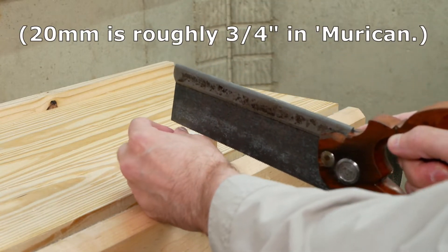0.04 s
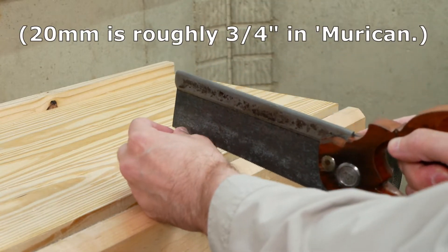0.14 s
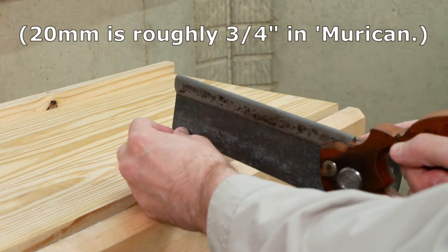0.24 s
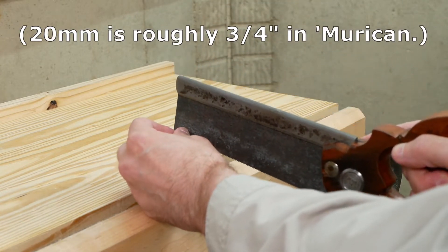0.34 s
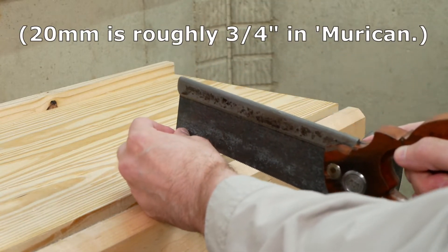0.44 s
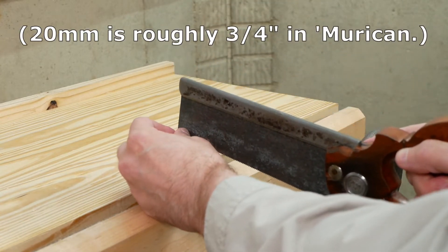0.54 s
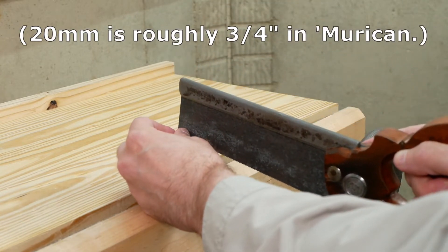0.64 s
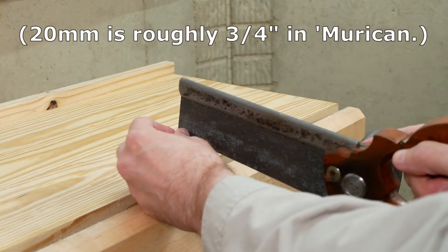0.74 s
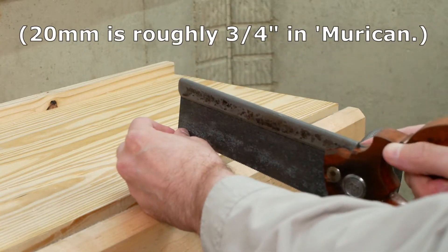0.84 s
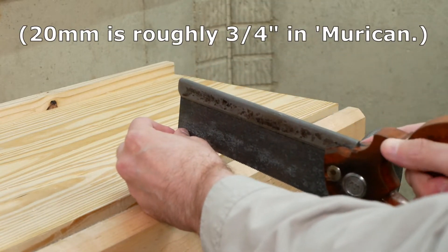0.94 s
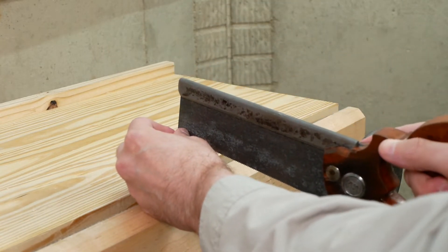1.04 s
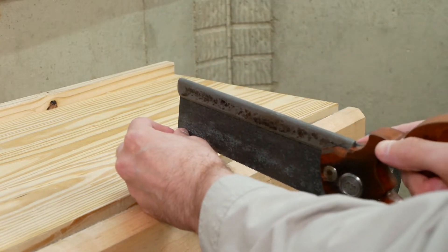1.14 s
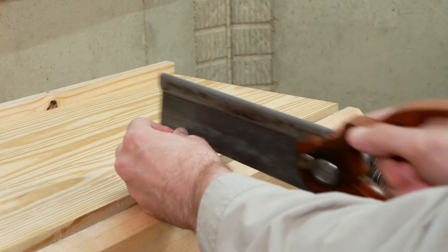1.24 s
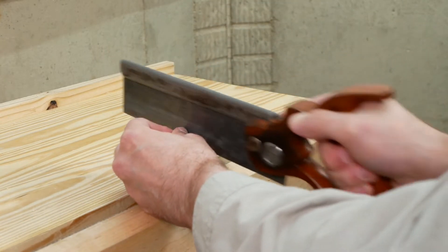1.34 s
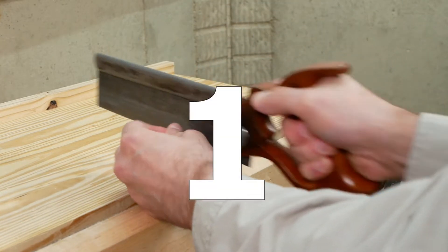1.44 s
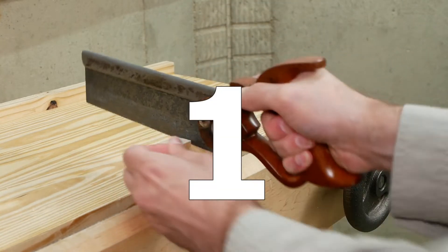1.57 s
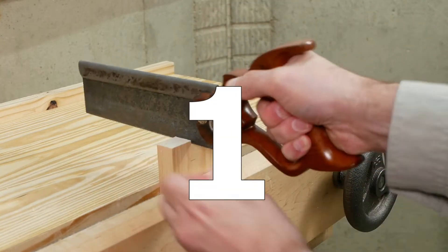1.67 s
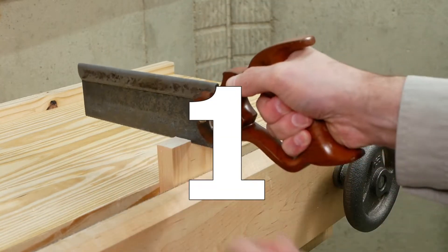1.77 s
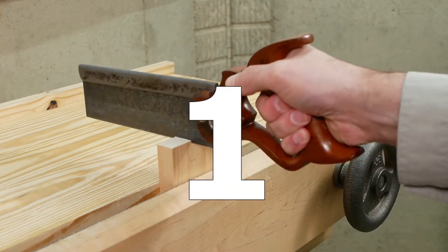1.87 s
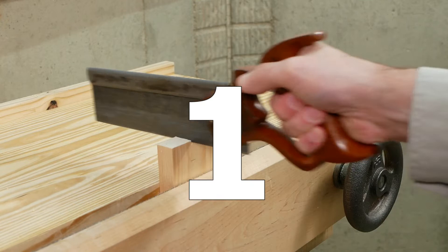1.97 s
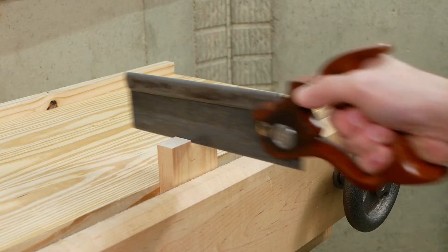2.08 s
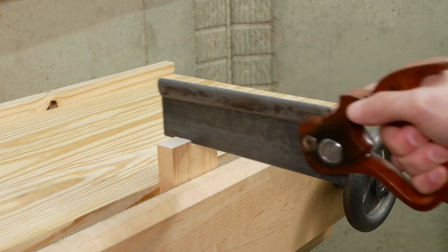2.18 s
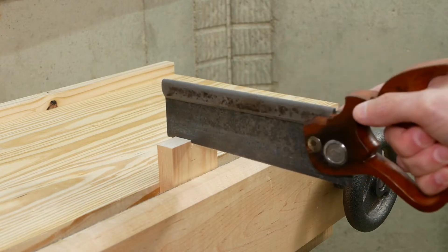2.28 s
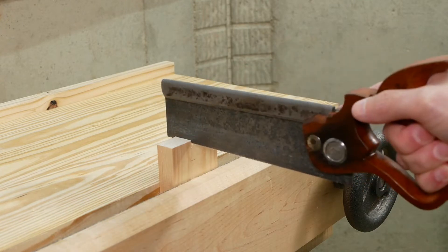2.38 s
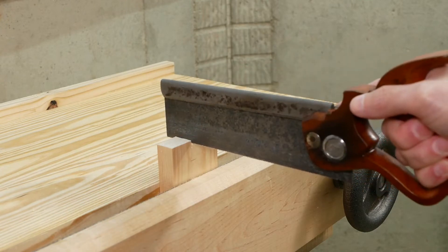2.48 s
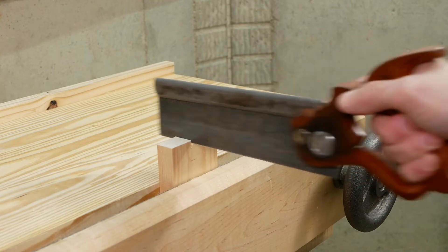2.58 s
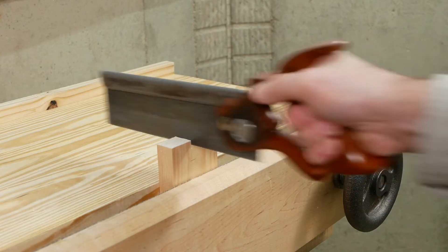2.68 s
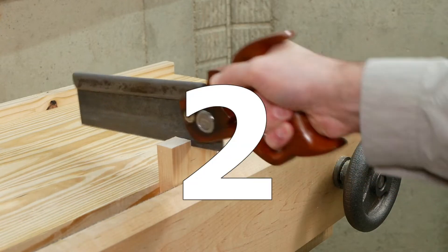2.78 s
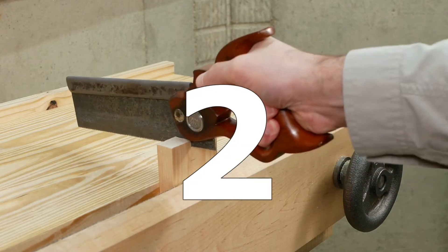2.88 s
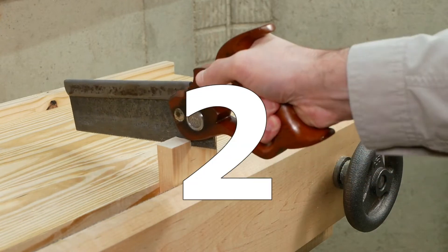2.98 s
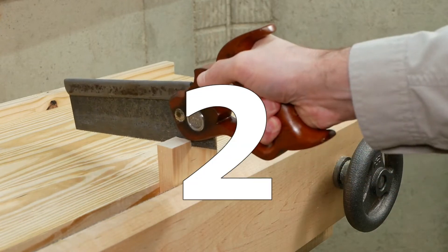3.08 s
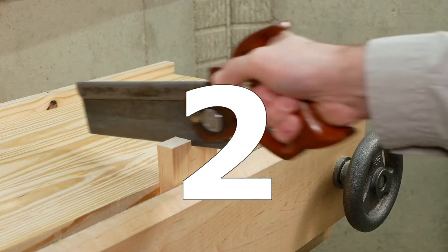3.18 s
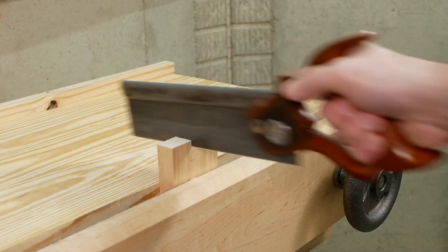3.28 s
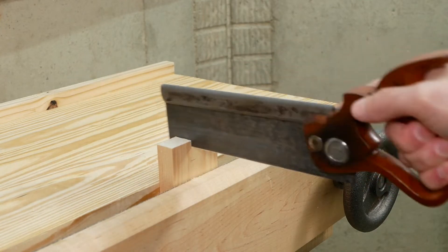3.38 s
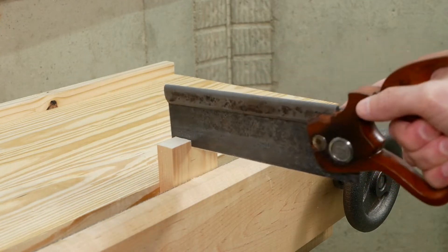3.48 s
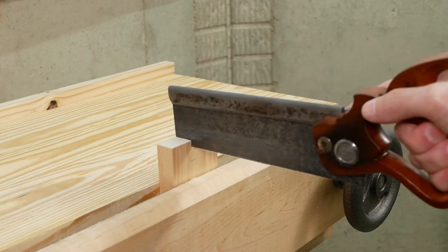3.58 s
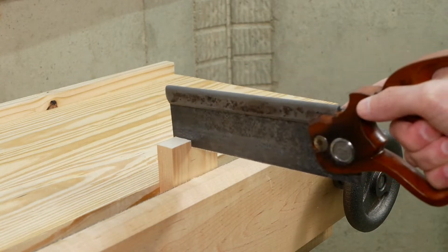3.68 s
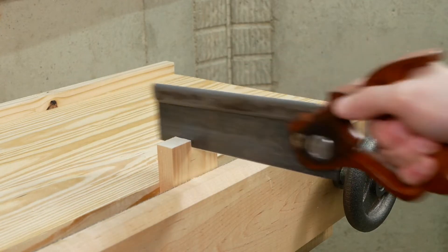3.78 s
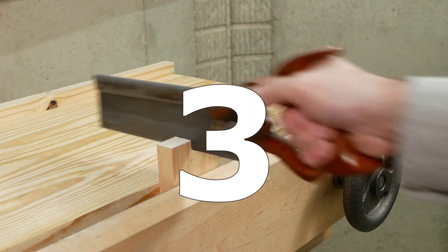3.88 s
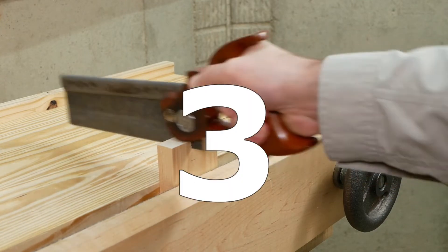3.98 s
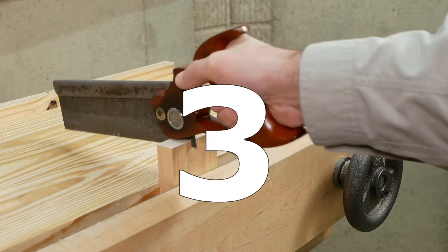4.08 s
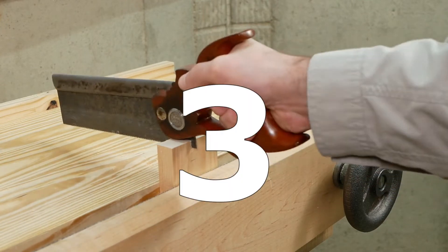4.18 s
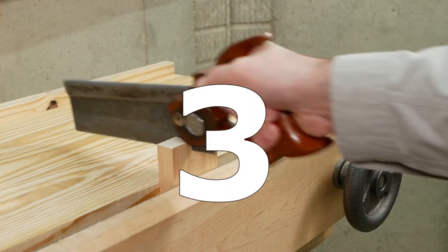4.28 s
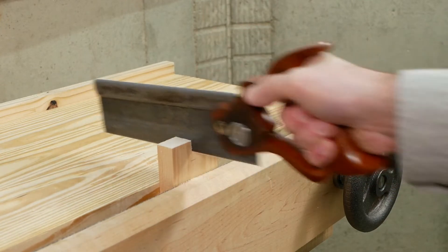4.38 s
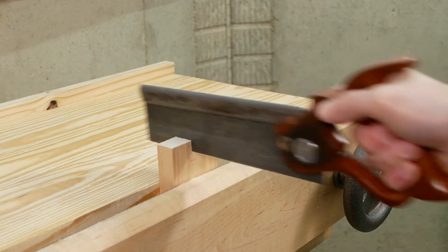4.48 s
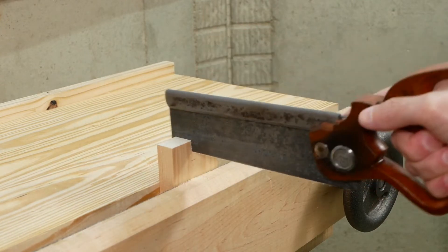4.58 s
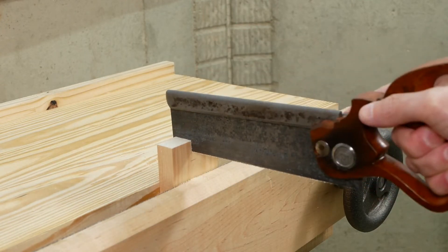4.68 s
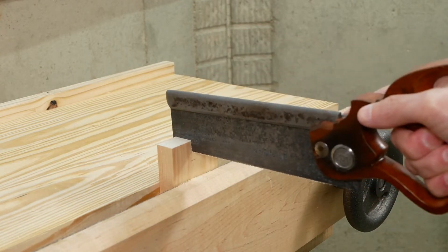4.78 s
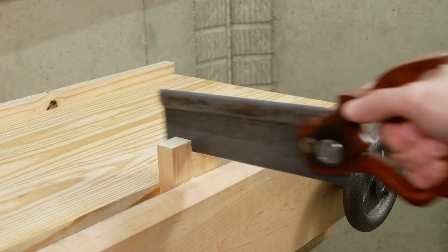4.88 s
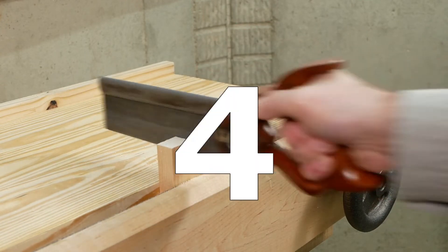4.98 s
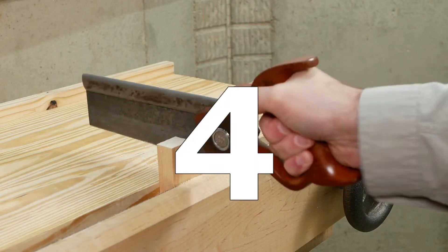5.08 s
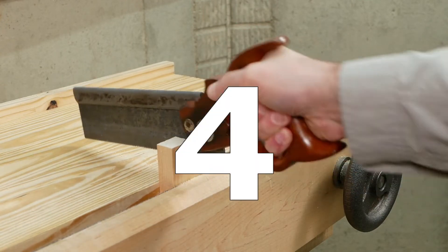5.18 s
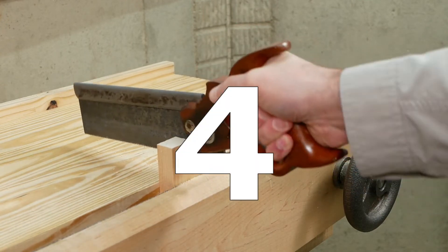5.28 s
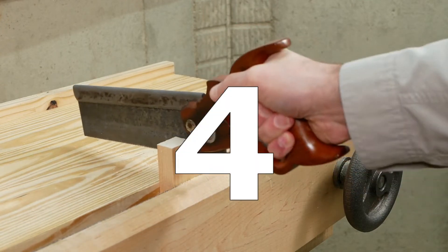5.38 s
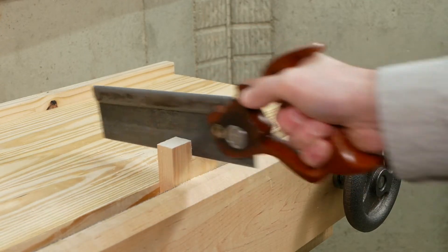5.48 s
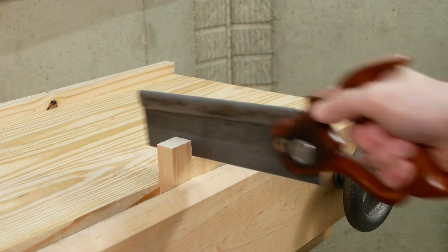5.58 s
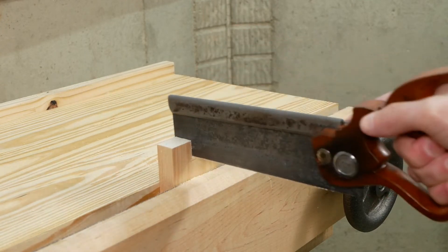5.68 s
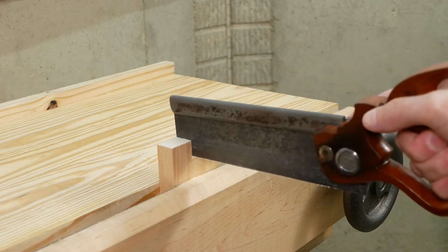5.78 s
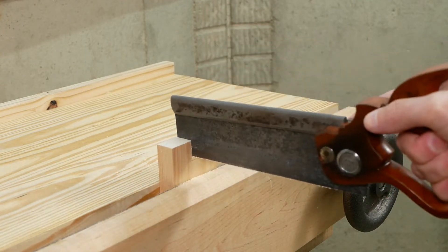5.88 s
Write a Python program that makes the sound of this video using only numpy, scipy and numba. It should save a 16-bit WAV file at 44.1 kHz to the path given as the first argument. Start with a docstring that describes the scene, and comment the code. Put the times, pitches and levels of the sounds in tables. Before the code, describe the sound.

Four push and four pull strokes of a hand saw rasp and buzz through clamped wood, following a second of near silence.

```python
"""Wooden groans, steely rasps and hiss: a backsaw, set on a small block in a wooden vise, cuts four pushes and
four pulls. Before the cut it rubs, ticks, pings and slides faintly into place. Teeth knock at stepped rates and
boom in bench and block where a rate meets a mode; torn fibres rattle the steel plate and hiss.
One microphone hears the saw well above the workshop's short reflections, over quiet air."""
import sys
import numpy as np
from scipy import signal
from scipy.fft import rfft, irfft, next_fast_len
from scipy.io import wavfile
from scipy.ndimage import uniform_filter1d
from numba import njit

SR = 44100
rng = np.random.default_rng(int(sys.argv[2]) if len(sys.argv) > 2 else 0)


def inscribe(sig):
    """Save sig as 16-bit PCM at rate SR to the path in sys.argv[1].

    A 1-D sig is mono; a 2-D sig holds one channel per row.
    Samples are clipped to [-1, 1] before scaling.
    """
    pcm = np.round(np.clip(np.atleast_2d(sig).T, -1, 1) * 32767)
    wavfile.write(sys.argv[1], SR, pcm.astype(np.int16))


N = 261537
STEP = 32   # samples between updates of slow controls

# Tables of modes share these columns; drives are relative:
# (frequency [Hz], width [Hz], push drive [dB], pull drive [dB], change while the cut is shallow [dB])
# modes of the bench
BENCH_MODES = [(60, 38, -24.5, -27, 2.5), (84, 4.7, -19.5, -18, 9), (123, 7.8, -4, -23.5, 2),
               (142.5, 14, -7.5, -3, -3.5), (160.4, 20.3, -9, -2.5, -6)]
# modes of block and vise, same columns
BLOCK_MODES = [(235.1, 20, -4, -5, 3.5), (324.7, 24.2, -3.5, -0.5, 3.5), (397.4, 101, -7.5, -10, 0.5),
               (483, 30.9, 1.5, 3, -4), (507.3, 35.8, -4.5, -6, 2), (752, 250, -32, -18, 11.5)]
# modes of saw plate and block surface, same columns
PLATE_MODES = [(824.5, 39, 0.5, -7, 1), (988.7, 42, 1.5, 6.5, 2.5), (1077, 23.5, 5, -6.5, -9),
               (1169, 32.5, 2, -6, -2), (1221, 45, -5.5, -7.5, 9), (1405, 235, -4.5, -7, 4),
               (1467, 91, -6, -2.5, 7.5), (1576, 150, -8.5, -10.5, 3.5), (1930, 76, -8, -11, 1.5),
               (2162, 86, -2.5, -5, 2.5), (2298, 38, 0.5, -1.5, -5.5), (2381, 51, -3, -7, 3),
               (2650, 110, -4, -12, -2.5), (2855, 39, -2, -17.5, -1), (3050, 160, -16, -27, 6),
               (3640, 172, -13, -22.5, 4)]
# high rings of the plate, same columns
PLATE_RINGS = [(4270, 63, 1.5, -8, -3), (5080, 77, 6.5, 6.5, -10), (5366, 90, 1.5, 2, -16),
               (5559.4, 150, 13, -9, -32), (5220, 650, -7, -21, -6)]
# highest rings, driven by the dust, same columns
TOP_RINGS = [(6560, 630, -7, -12, 2.5), (8150, 530, -9, -7, -2.5), (10340, 330, -6, -9, -1.5),
             (11400, 400, -12.5, -18, -1), (14560, 1600, -7.5, -8, -2)]

# colour of the fibre hiss: (frequency [Hz], relative density [dB])
HISS_COLOUR = [(2180, -1), (3700, -7.5), (4740, -6), (5540, -8.5), (6300, -22), (8190, -50), (13900, -120)]
# colour of the fine dust hiss: (frequency [Hz], relative density [dB])
DUST_COLOUR = [(3530, -8), (6000, -3), (7020, -4.5), (7950, 1.5), (9080, -1), (10300, 1.5), (12600, -8),
               (14200, -11), (15100, -6), (15750, -4)]

# effort of the cut, short curves one after another:
# (time [s], rasp of the plate [dB], groan of the block [dB], hiss of the dust [dB])
EFFORT = [
    [(1.23, -59, -64, -64), (1.262, -35.5, -35, -39.5), (1.372, -28, -22, -37.5), (1.404, -32, -27, -41),
     (1.542, -32, -20.5, -42), (1.574, -49, -28.5, -54), (1.626, -61.5, -55, -57.5),
     (1.752, -67.5, -64, -59), (1.84, -70, -67, -58.5), (1.92, -65, -68, -61), (1.982, -66, -67, -67),
     (2.0, -50, -60, -61)],
    [(2.0, -49, -47, -61), (2.016, -42, -43.5, -55), (2.052, -38, -29, -51.5), (2.14, -33.5, -27.5, -47.5),
     (2.222, -40.5, -26, -54), (2.32, -63, -58, -76), (2.43, -77.5, -77, -73), (2.588, -66, -63, -74),
     (2.594, -51.5, -46, -56), (2.625, -54.5, -44.5, -67)],
    [(2.625, -52, -55, -51.5), (2.637, -35, -29, -45), (2.661, -34.5, -25.5, -41), (2.679, -23, -37, -41.5),
     (2.697, -28, -20, -38.5), (2.745, -26.5, -18, -37), (2.869, -40, -26.5, -49),
     (2.973, -61, -54.5, -72.5), (3.137, -95, -71, -74.5), (3.168, -63, -65, -86)],
    [(3.168, -56, -67, -68), (3.196, -46.5, -45.5, -55.5), (3.242, -35, -32, -53), (3.352, -32.5, -22, -46),
     (3.388, -32.5, -39.5, -50.5), (3.414, -36, -24.5, -54.5), (3.526, -67, -61, -77.5),
     (3.568, -53, -49, -60.5), (3.664, -79, -63, -88), (3.685, -75, -66, -86)],
    [(3.685, -61, -65, -81), (3.715, -50.5, -42.5, -52.5), (3.783, -77.5, -75.5, -87),
     (3.8, -60.5, -55, -68)],
    [(3.8, -54, -70, -71), (3.808, -38.5, -30.5, -46), (3.832, -26.5, -26.5, -39.5),
     (3.966, -24.5, -29.5, -37.5), (3.978, -25.5, -16, -40), (4.016, -34.5, -22, -43),
     (4.114, -55.5, -62, -66), (4.228, -78, -68, -89), (4.25, -76.5, -68, -91)],
    [(4.25, -60, -65, -77), (4.266, -53.5, -59, -58.5), (4.392, -35, -28.5, -51),
     (4.524, -33.5, -32.5, -47.5), (4.62, -43.5, -33.5, -55.5), (4.77, -80.5, -83, -92),
     (4.836, -106, -86, -94), (4.88, -54, -54.5, -76), (4.918, -58, -59, -74)],
    [(4.918, -46.5, -55.5, -57), (4.95, -27, -23, -42.5), (5.014, -23.5, -30.5, -37),
     (5.062, -26.5, -23, -40), (5.164, -55.5, -46.5, -65), (5.18, -53, -48, -68)],
    [(5.18, -56, -44, -57), (5.19, -40, -37.5, -49.5), (5.226, -37.5, -36.5, -51), (5.248, -49, -41.5, -63),
     (5.344, -72, -75, -75), (5.438, -80, -70, -78)],
    [(5.438, -60, -56, -71), (5.466, -44.5, -52, -59), (5.58, -29, -19.5, -53), (5.642, -33, -32.5, -49.5),
     (5.698, -37, -30, -56), (5.704, -33, -28, -54), (5.804, -62.5, -57.5, -74.5), (5.93, -69.5, -73, -83)],
]
# each stroke, push and pull in turn: (start time [s], fibre hiss against dust hiss [dB])
STROKES = [(1.232, -20), (1.998, 1.5), (2.59, 2), (3.168, 2.5), (3.685, 1.5), (4.25, 2.5), (4.87, 4),
           (5.438, 1.5)]
TURN_EARLY_S, TURN_S = .05, .05   # the saw turns round just before a stroke
SECOND_STROKE_DEPTH, DEPTH_PER_STROKE = .6, .13   # the first push opens the cut, then it deepens to 1

# the teeth chatter at a ring of bench or block, then slip to another: (start time [s], mean rate [teeth/s])
CHATTER = [(0, 220), (1.28, 335), (1.41, 218), (1.49, 121), (1.54, 241), (1.61, 136), (1.99, 238),
           (2.03, 349), (2.1, 472), (2.17, 335), (2.215, 483), (2.259, 330), (2.32, 148), (2.63, 370),
           (2.68, 482), (2.76, 272), (2.775, 110), (2.83, 237), (2.92, 117), (3.19, 343), (3.325, 475),
           (3.395, 376), (3.435, 158), (3.52, 330), (3.78, 241), (3.82, 330), (3.9, 514), (3.995, 298),
           (4.015, 263), (4.039, 121), (4.3, 230), (4.38, 343), (4.475, 406), (4.535, 340), (4.62, 237),
           (4.68, 160), (4.93, 346), (4.97, 537), (5.07, 234), (5.12, 141), (5.44, 236), (5.51, 339),
           (5.635, 447), (5.68, 357), (5.76, 134)]
SLIP_S = .025
# brief jolts in the loudness of rasp and dust hiss:
# (time [s], change just before [dB], change just after [dB])
JOLTS = [(1.502, -9, 4.5), (2.855, -1, 7), (2.89, -11, 4.5), (3.41, 2, 1.5), (3.83, -3, -5),
         (4.501, 1, 1.5), (5.104, -1.5, -3), (5.665, 2.5, 3.5)]
JOLT_BEFORE_S, JOLT_AFTER_S = .012, 0.019   # decay times away from the jolt

# the saw rubs the block while it is set in place: (time [s], block [dB], plate [dB], hiss [dB])
RUBS = [(0.001, -56, -58, -54.5), (0.018, -62, -77, -57.5), (0.088, -65, -75, -70), (0.15, -67, -77.5, -74),
        (0.256, -52.5, -72, -77), (0.29, -63, -81, -62), (0.455, -65.5, -71, -86), (0.495, -60, -71, -84),
        (0.534, -65, -72, -83), (0.565, -66, -74, -88), (0.6, -68, -75, -88), (0.65, -67, -89, -88),
        (0.828, -70.5, -87, -63), (1.15, -75, -80, -68), (1.2, -71, -75, -66)]
RUB_RISE_DB_PER_S, RUB_FALL_DB_PER_S, RUB_HISS_FALL_DB_PER_S = 1497, 303, 501
BRUSH_DB, BRUSH_DARKER_DB = -54, 9   # below this level the first light contact rustles darker

# the saw binds and the bench booms: (time [s], peak level [dB])
BOOMS = [(1.515, -21), (1.617, -34), (2.048, -39.5), (2.21, -29), (2.775, -22), (2.81, -22), (2.862, -22),
         (3.302, -37), (3.414, -37.5), (3.831, -36.5), (4.023, -25.5), (4.355, -42.5), (5.05, -33),
         (5.23, -31.5), (5.497, -39), (5.581, -35)]
BOOM_RISE_DB_PER_S, BOOM_FALL_DB_PER_S = 448, 329.5
FULL_GROAN_DB, BENCH_DB = -26.5, -47   # bench level when the block is at full groan
BENCH_FOLLOWS = 0.56   # share of the block's swing in dB

# a tooth or the plate touches the wood:
# (time [s], relative strength [dB], colour [Hz], drive of the plate against the click [dB])
TICKS = [(.004, -51, 3530, 12), (0.022, -49.5, 1470, 12.5), (0.829, -44.5, 4370, 13),
         (1.691, -39, 2500, -9), (2.595, -36, 2527, 12.5), (3.091, -45, 3000, 9), (3.69, -49, 2611, 13),
         (3.709, -37.5, 2200, 20), (3.832, -31.5, 1200, 30), (3.125, -49, 999, -6), (4.119, -36, 7974, -2),
         (.257, -60, 2150, 16), (.287, -53, 7700, 0), (0.524, -58, 2300, 4), (.87, -58, 1950, -5),
         (1.92, -50, 4000, 0), (.65, -58, 2190, 8), (4.88, -49.5, 2200, 21), (4.89, -48, 2491, -1),
         (5.397, -34.5, 1614, -14)]
# hands and saw bump block and vise: (time [s], relative strength [dB])
BUMPS = [(0.017, -39.5), (0.086, -45), (0.252, -69), (0.529, -54), (0.828, -53.5), (2.636, -15.5),
         (3.974, -22), (4.945, -32)]
# the free plate is flicked before it is in the cut: (time [s], relative strength [dB])
FLICKS = [(.003, -1)]
# tones of the flicked plate: (frequency [Hz], width [Hz], push drive [dB], pull drive [dB])
PING_TONES = [(3079, 9.8, -3, 2), (4280, 30, -7, -8), (4540, 40, -7, -8), (5100, 15, -10, -16),
              (5771, 15, -11, -14)]
# the plate sings faintly as it slides into place: (time [s], level [dB])
SLIDE = [(0.0, -67), (0.254, -72.5), (0.338, -79), (0.524, -73.5), (0.67, -99)]
# tones of the sliding plate: (frequency [Hz], width [Hz], push drive [dB], pull drive [dB])
SLIDE_TONES = [(830, 26, -8.5, 0), (980, 30, -7, 0), (6700, 400, -21.5, -14)]

SHOP_T60_S, SHOP_DB = 0.22, -12.5   # decay time, and level of the reflections' response against direct sound
# colour of the quiet workshop air: (frequency [Hz], relative density [dB])
AIR_COLOUR = [(15, -26.5), (25, 12.5), (70, 3.5), (156, -3), (652, -16), (1000, -15), (1310, -16),
              (1590, -18), (8680, -21), (15700, -25.5)]
AIR_DB = -67.5   # before the microphone's limits
CUTOFF_HZ = 15700   # top of the microphone's range


def saw(pull, depth):
    """Teeth drive bench and block; torn fibres drive the plate and the hiss."""
    teeth_per_s = held(*np.transpose(CHATTER), SLIP_S)
    bench_db, block_db, plate_db, hiss_db, dust_db = levels()
    darker_db = BRUSH_DARKER_DB * ((BRUSH_DB - dust_db) / 6).clip(0, 1) * (depth == 0)
    hiss_db, dust_db = hiss_db + darker_db, dust_db - darker_db

    phase, bites = teeth(teeth_per_s, wobble=.045, uneven_db=5.5)
    load = ((block_db + 62.5) / 25).clip(0, 1)   # teeth bite only under load
    bites = (bites - np.mean(bites)) * load
    clumps = amp(1.1 * filled(wander(43)))   # grain comes in clumps
    torn = fibres(phase, 5000, spread_db=3.0, depth=0.46) * clumps
    bench, block = groan(bites, torn, pull, depth)
    plate = rasp(bites, torn, plate_db, pull, depth)
    dust = fibres(phase, 15000, spread_db=0.5, depth=0.15)
    hiss = fibre_hiss(dust, torn, pull, depth)
    fine = dust_hiss(dust, pull, depth)

    wood = amp(bench_db) * steady(bench, 0.033) + amp(block_db) * steady(block, 0.029)
    steel = amp(plate_db) * steady(plate, 0.066)
    return wood + steel + amp(hiss_db) * steady(hiss, 0.037) + amp(dust_db) * steady(fine, 0.045)


def groan(bites, torn, pull, depth):
    """Soft wood dulls the knocks, which with torn fibres ring the modes of bench and block."""
    push = signal.sosfilt(signal.butter(2, 450, fs=SR, output="sos"), bites)
    bench = resonate(push + 0.93 * torn, BENCH_MODES, pull, depth)
    block = resonate(push + .3 * torn, BLOCK_MODES, pull, depth, wander_db=1.5)
    return bench, block


def rasp(bites, torn, plate_db, pull, depth):
    """Fibres and teeth ring the plate; a free plate or light contact rattles more broadly."""
    light = ((-38 - plate_db) / 12).clip(0, 1) * (1 - 0.56 * depth)
    broad = signal.sosfilt(signal.butter(2, [600, 3800], "band", fs=SR, output="sos"), torn)
    tones = resonate(torn + 0.24 * bites, PLATE_MODES, pull, depth, wander_db=1.5, bend=0.013)
    return tones + (.2 - 0.14 * depth + .1 * light) * broad


def fibre_hiss(dust, torn, pull, depth):
    """Dust and torn fibres make coloured noise, and dust excites the plate's high rings."""
    rings = resonate(dust, PLATE_RINGS, pull, depth, wander_db=6.5, bend=0.022)
    return coloured(dust + 0.27 * torn, HISS_COLOUR) + 1.5 * rings


def dust_hiss(dust, pull, depth):
    """Dense fine snaps hiss, darker in a shallow cut, and excite the highest rings."""
    bright = coloured(dust, DUST_COLOUR)
    dull = signal.sosfilt(signal.butter(2, 11000, fs=SR, output="sos"), bright)
    rings = resonate(dust, TOP_RINGS, pull, depth, wander_db=3, bend=.02)
    return dull + (0.69 + 0.59 * depth) * (bright - dull) + rings


def teeth(per_s, wobble, uneven_db):
    """Phase of the passing teeth, and one click of uneven strength for each tooth."""
    slow = signal.lfilter([.01], [1, -.99], rng.standard_normal(N))
    phase = np.cumsum(per_s * (1 + wobble * slow / np.std(slow)).clip(.2)) / SR
    bites = np.diff(np.floor(phase), prepend=0) > 0
    # fewer teeth a second strike harder, to keep the power even
    return phase % 1, bites * amp(uneven_db * rng.standard_normal(N)) * np.sqrt(SR / per_s)


def fibres(phase, per_s, spread_db, depth):
    """Dense snaps of fibre, strongest just after each tooth passes."""
    sizes = amp(spread_db * np.minimum(rng.exponential(1, N), 4)) * rng.choice([-1, 1], N)
    snaps = sizes * (rng.random(N) < per_s / SR)
    return snaps / np.std(snaps) * (1 - depth + depth * 3 * np.exp(-3 * phase))


def seat():
    """Direction of the saw (0 push, 1 pull) and depth of the cut (0-1)."""
    k, turns = np.arange(len(STROKES)), np.array(STROKES)[:, 0] - TURN_EARLY_S
    depths = (k > 0) * (SECOND_STROKE_DEPTH + DEPTH_PER_STROKE * (k - 1)).clip(0, 1)
    return held(turns, k % 2, TURN_S), held(turns, depths, TURN_S)


def levels():
    """Levels in dB of bench, block, plate, fibre hiss and dust hiss, from effort, jolts, rubs and booms."""
    before_cut = [(0, -120, -120, -120), (1.2, -120, -120, -120)]
    rasp_db, groan_db, dust_db = in_time(np.vstack([before_cut] + EFFORT))
    jolt_db = jolts()
    rasp_db, dust_db = rasp_db + jolt_db, dust_db + jolt_db
    s, rub_block_db, rub_plate_db, rub_hiss_db = np.transpose(RUBS)
    block_db = louder(groan_db, swells(s, rub_block_db, RUB_RISE_DB_PER_S, RUB_FALL_DB_PER_S))
    plate_db = louder(rasp_db, swells(s, rub_plate_db, RUB_RISE_DB_PER_S, RUB_FALL_DB_PER_S))
    dust_db = louder(dust_db, swells(s, rub_hiss_db, RUB_RISE_DB_PER_S, RUB_HISS_FALL_DB_PER_S))
    boom_db = swells(*np.transpose(BOOMS), BOOM_RISE_DB_PER_S, BOOM_FALL_DB_PER_S)
    bench_db = louder(BENCH_DB + BENCH_FOLLOWS * (block_db - FULL_GROAN_DB), boom_db)
    hiss_db = dust_db + held(*np.transpose(STROKES), TURN_S)
    return bench_db, block_db, plate_db, hiss_db, dust_db


def jolts():
    """Level change in dB of rasp and dust hiss around each jolt, fading away on both sides."""
    t, change_db = np.arange(0, N, STEP) / SR, 0
    for s, before_db, after_db in JOLTS:
        before = before_db * np.exp(-np.abs(t - s) / JOLT_BEFORE_S)
        after = after_db * np.exp(-np.abs(t - s) / JOLT_AFTER_S)
        change_db = change_db + np.where(t < s, before, after)
    return filled(change_db)


def swells(times, peaks_db, rise_db_per_s, fall_db_per_s):
    """Each event swells to its peak and dies away; the loudest one counts."""
    t = np.arange(0, N, STEP) / SR
    curves = [db - np.maximum(rise_db_per_s * (s - t), fall_db_per_s * (t - s))
              for s, db in zip(times, peaks_db)]
    return filled(np.max(curves, axis=0))


def touches(pull, depth):
    """Ticks click and ring the plate, bumps boom in block and bench, a flick pings the free plate."""
    ticks, strikes, t = np.zeros(N), np.zeros(N), np.arange(300) / SR
    for s, db, hz, ring_db in TICKS:
        click = amp(db) * np.sin(2 * np.pi * hz * t) * np.exp(-1.3 * hz * t)   # about one cycle
        at = round(s * SR)
        ticks[at:at + 300] += click
        strikes[at:at + 300] += click * amp(ring_db)
    rings = resonate(strikes, PLATE_MODES + PLATE_RINGS, pull, depth, wander_db=3.5)
    bumps = 120 * resonate(blows(*np.transpose(BUMPS)), BENCH_MODES + BLOCK_MODES, pull)
    pings = resonate(blows(*np.transpose(FLICKS)), PING_TONES, pull)
    return 1.13 * ticks + 0.84 * rings + bumps + pings


def blows(times, levels_db):
    """One single-sample impulse at each time."""
    clicks = np.zeros(N)
    clicks[np.round(times * SR).astype(int)] = amp(levels_db)
    return clicks


def slide():
    """Light friction, as noise, keeps a few plate tones sounding."""
    level_db, = in_time(SLIDE + [(.8, -110)])
    return amp(level_db) * steady(resonate(rng.standard_normal(N), SLIDE_TONES, 0), 0.1)


def shop(x):
    """Workshop reflections as a dull, decaying noise tail after a short gap."""
    t = np.arange(int(.6 * SR)) / SR
    tail = rng.standard_normal(len(t)) * amp(-60 * t / SHOP_T60_S) * (t > .006)
    tail = signal.sosfilt(signal.butter(1, 5000, fs=SR, output="sos"), tail)
    return signal.fftconvolve(x, tail / np.sqrt(np.sum(tail ** 2)))[:N]


def workshop_air():
    """Quiet background of the place: steady coloured noise."""
    return amp(AIR_DB) * coloured(rng.standard_normal(N), AIR_COLOUR)


def resonate(force, modes, pull, depth=1, wander_db=0, bend=0):
    """Parallel resonances; direction, depth and chance set each one's drive, chance also bends its pitch."""
    out, pull, depth = 0, (pull + np.zeros(N))[::STEP], (depth + np.zeros(N))[::STEP]
    for k, (hz, width, push_db, pull_db, *shallow_db) in enumerate(modes):
        level_db = push_db + pull * (pull_db - push_db) + (1 - depth) * sum(shallow_db)
        level_db = level_db + wander_db * wander(10.3)
        cosine = np.cos(2 * np.pi * hz / SR * (1 + bend * wander(4.16)))
        radius = np.exp(-np.pi * width / SR)
        out = out + (-1) ** k * ring(force, amp(level_db), cosine, radius, STEP)   # alternating sign
    return out


@njit
def ring(x, gain, cosine, r, step):
    """One two-pole resonance whose drive and pitch move slowly."""
    out, driven = np.zeros(len(x)), np.zeros(len(x))
    for i in range(len(x)):
        driven[i] = x[i] * gain[i // step] * (1 - r * r) / 2
        if i > 1:
            feedback = 2 * r * cosine[i // step] * out[i - 1] - r * r * out[i - 2]
            out[i] = driven[i] - driven[i - 2] + feedback + 1e-18
    return out


def coloured(x, spectrum):
    """White input shaped to a spectrum; rms 1."""
    hz, db = np.transpose(spectrum)
    size = next_fast_len(N, True)
    log_hz = np.log(np.fft.rfftfreq(size, 1 / SR) + 1)
    gain = amp(np.interp(log_hz, np.log(hz), db))
    out = irfft(rfft(x, size) * gain, size)[:N]
    return out / np.std(out)


def steady(x, window_s):
    """Running level evened out to rms 1."""
    size = max(int(window_s * SR), 8)
    power = uniform_filter1d(uniform_filter1d(x ** 2, size), size)
    return x / np.sqrt(power + 1e-12)


def wander(rate_hz):
    """Slow chance of spread 1, one value a step."""
    r = np.exp(-2 * np.pi * STEP * rate_hz / SR)
    noise = rng.standard_normal(len(range(0, N, STEP)) + 1000)
    slow = signal.lfilter([1], [1, -2 * r, r * r], noise)[1000:]   # skip the settling
    return slow / np.std(slow)


def held(times, values, glide_s):
    """Each value holds from its time, with a glide centred on each change."""
    index = (np.searchsorted(times, np.arange(N) / SR) - 1).clip(0)
    steps = np.asarray(values, float)[index]
    return uniform_filter1d(steps, max(int(glide_s * SR), 1))


def in_time(rows):
    """Columns of a curve table at every sample."""
    s, *columns = np.transpose(rows)
    return [np.interp(np.arange(N) / SR, s, c) for c in columns]


def filled(slow):
    """A control given once a step, at every sample."""
    return np.interp(np.arange(N), np.arange(0, N, STEP), slow)


def louder(*levels_db):
    """Level in dB of several sounds together, by adding powers."""
    return 10 * np.log10(sum(amp(db) ** 2 for db in levels_db))


def amp(db):
    """Gain of a level in dB."""
    return np.exp(np.asarray(db) * np.log(10) / 20)


def scene():
    """Saw, touches and slide with the workshop's reflections, over its quiet air."""
    pull, depth = seat()
    work = saw(pull, depth) + touches(pull, depth) + slide()
    return (work + amp(SHOP_DB) * shop(work) + workshop_air())[None]


def record(dry):
    """One microphone channel: the deepest bass and the extreme treble are cut."""
    dry = signal.sosfilt(signal.butter(4, 55, "high", fs=SR, output="sos"), dry)
    return signal.sosfilt(signal.ellip(14, .5, 70, CUTOFF_HZ, fs=SR, output="sos"), dry)


dry = scene()
out = record(dry)
inscribe(out)
```